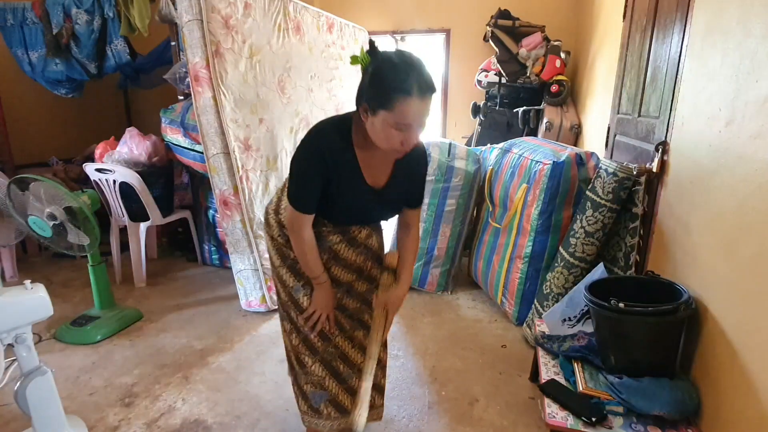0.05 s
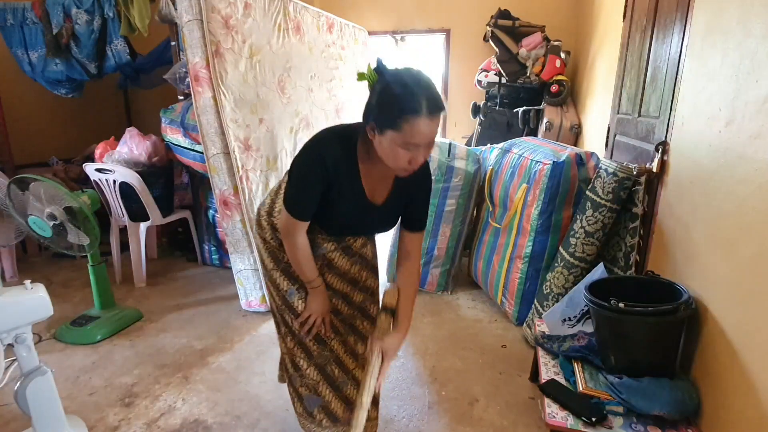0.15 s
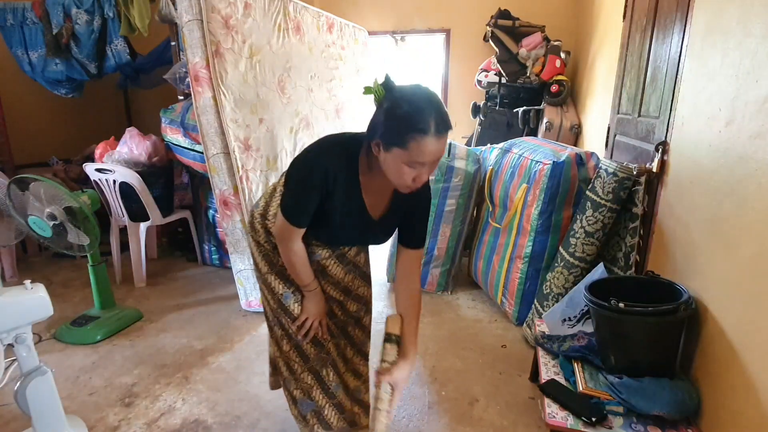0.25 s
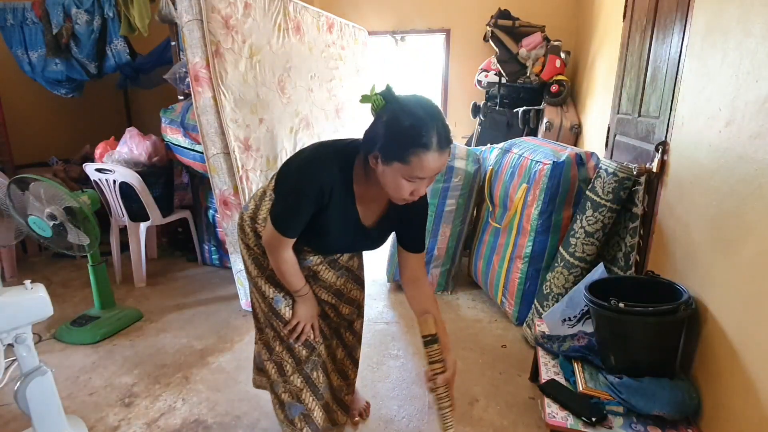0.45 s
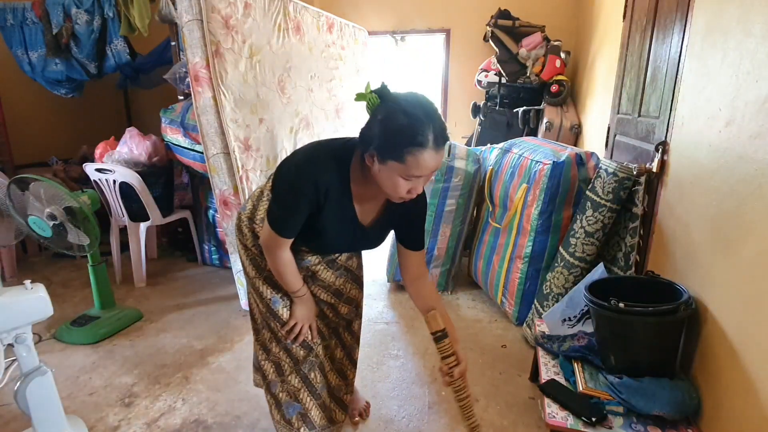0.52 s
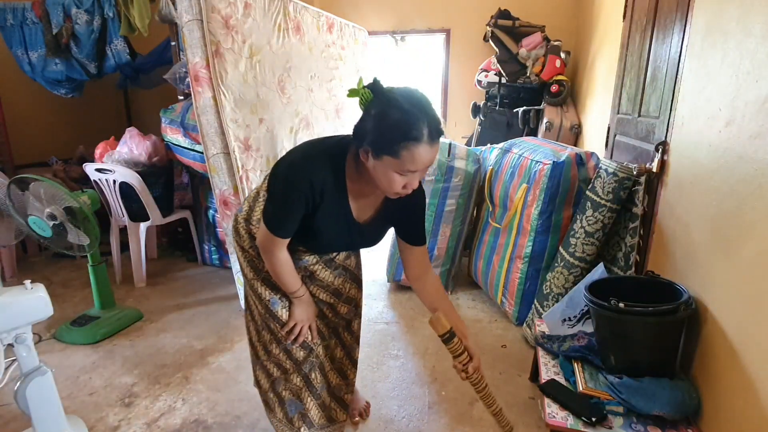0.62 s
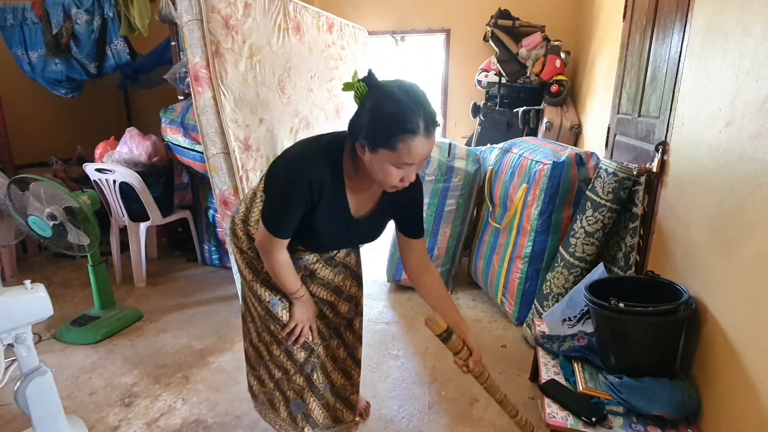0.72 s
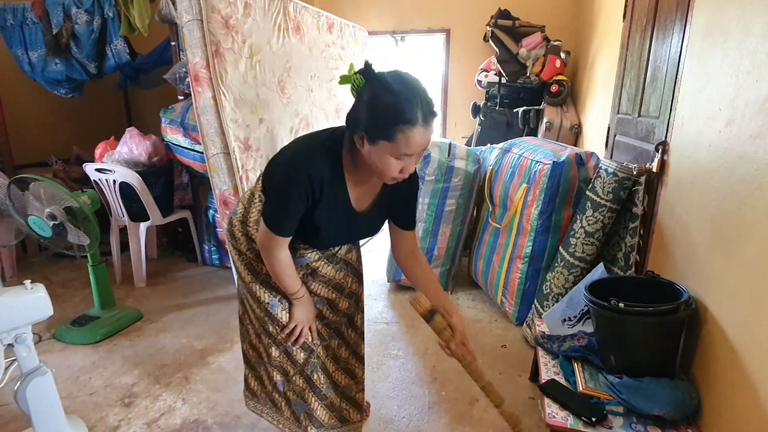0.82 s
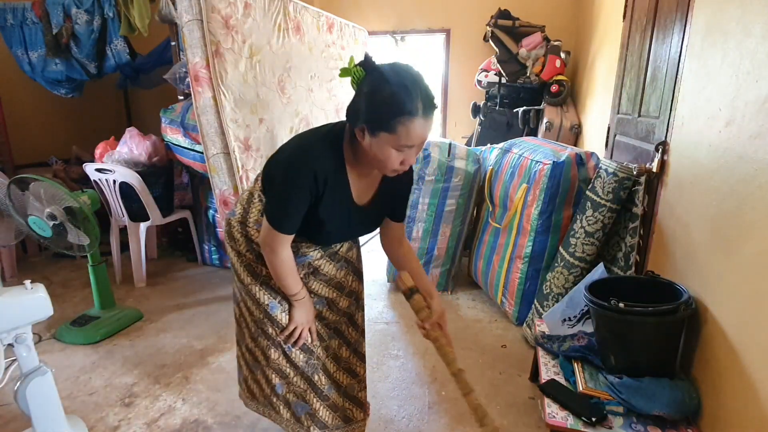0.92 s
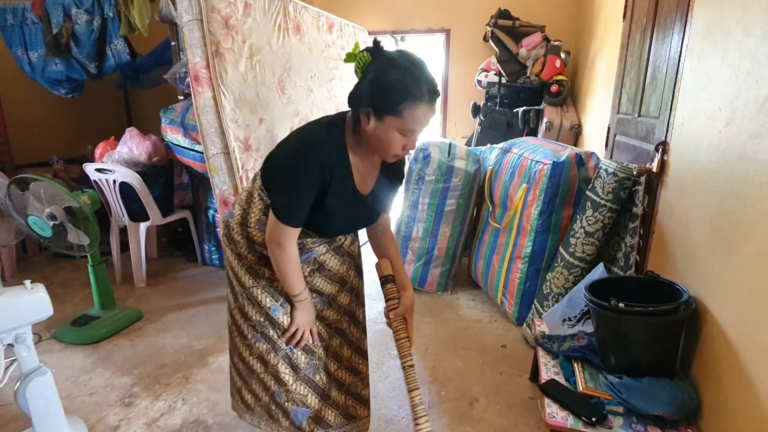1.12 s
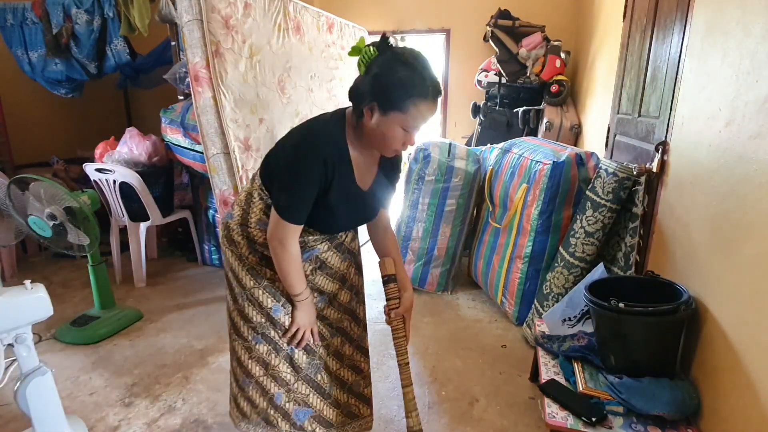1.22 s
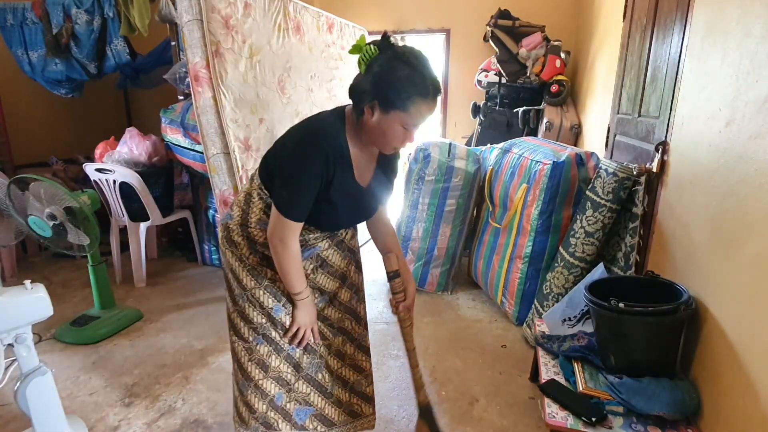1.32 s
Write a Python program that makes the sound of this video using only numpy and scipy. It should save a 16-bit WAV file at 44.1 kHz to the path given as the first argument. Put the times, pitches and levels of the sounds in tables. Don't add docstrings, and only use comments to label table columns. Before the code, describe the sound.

Broom sweeping on concrete indoors: one loud scratchy swish with clacks, then faint brushing and taps

```python
import sys
import numpy as np
from scipy import signal
from scipy.fft import rfft, irfft
from scipy.io import wavfile

SR = 44100
rng = np.random.default_rng(int(sys.argv[2]) if len(sys.argv) > 2 else 0)


def level_to_linear(level):
    exponent = np.asarray(level, float) / 20
    return 10 ** exponent


def store_wav(level_fs):
    pcm = np.round(np.clip(np.atleast_2d(level_fs), -1, 1) * 32767)
    wavfile.write(sys.argv[1], SR, pcm.T.astype(np.int16))


N = 59535


def read(points, hz):
    f, value = np.transpose(points)
    return np.interp(np.log(hz + 1), np.log(f + 1), value)


def evened(x):
    return x / np.sqrt(np.mean(x ** 2) + 1e-20)


def coloured(x, gain_db):
    both_sides_db = np.concatenate([gain_db, gain_db[-2:0:-1]])
    log_gain = np.log(level_to_linear(both_sides_db))
    phase = -signal.hilbert(log_gain).imag
    taps = np.fft.ifft(np.exp(log_gain + 1j * phase)).real[:4096]
    return signal.oaconvolve(x, taps)[:len(x)]


# [t/s, pressure level/dB, speed brightening/dB]
STROKE = [(0, -36, -1), (.07, -39.5, -6), (.14, -39, 2), (.2, -34, 3), (.245, -36.5, 6.5),
          (0.309, -39, 7.5), (.33, -22, -2), (0.366, -19.5, 3), (0.432, -24.5, 5), (0.511, -27, -2),
          (.62, -41, 6.5), (.672, -34.5, 3), (.75, -47, 5), (.88, -38.5, 0.5), (.97, -49.5, 9),
          (1.01, -42.5, 10), (1.1, -42, -30), (1.2, -67, -13)]
# [f/Hz, density/dB per Hz]
BRISTLE = [(60, -2.5), (160, -1.5), (250, -4), (400, -0.5), (750, -3.5), (2200, -8.5), (3400, -14.5),
           (7500, -20.5)]
# [f/Hz, level/dB]
TIPS = [(7600, -0.1), (8700, -5.5), (9600, -5), (11500, -1.5), (15500, -8.5)]
BRIGHT_FROM_HZ, BRIGHT_FULL_HZ = 600, 2000
SLIPS_PER_S, SLIP_SPREAD_DB = 3500, 2.5
CLUMP_DB, CLUMP_S = 2.5, .015


def bristles():
    t_s, pressure_db, bright_db = np.transpose(STROKE)
    t = np.arange(N) / SR
    slipping = rng.random(N) < SLIPS_PER_S / SR
    force = np.minimum(rng.exponential(1, N), 3.5)
    sign = rng.choice([-1., 1.], N)
    window = np.hanning(round(CLUMP_S * SR))
    clump = evened(signal.oaconvolve(rng.standard_normal(N), window, "same"))
    slips = sign * slipping * level_to_linear(SLIP_SPREAD_DB * force + CLUMP_DB * clump)

    filter_hz = np.fft.rfftfreq(8192, 1 / SR)
    scratch = evened(coloured(slips, read(BRISTLE, filter_hz) + read(TIPS, filter_hz)))

    high_share = read([(BRIGHT_FROM_HZ, 0), (BRIGHT_FULL_HZ, 1)], np.fft.rfftfreq(N, 1 / SR))
    high = irfft(rfft(scratch) * high_share, N)
    low = scratch - high
    pressure = level_to_linear(np.interp(t, t_s, pressure_db))
    return pressure * (low + high * level_to_linear(np.interp(t, t_s, bright_db)))


def rings(events, shape):
    length = 2000
    t = np.arange(length) / SR
    out = np.zeros(N + length)
    for t_s, level_db, *settings in events:
        at = round(t_s * SR)
        out[at:at + length] += level_to_linear(level_db) * shape(t, *settings)
    return out[:N]


# [t/s, peak level/dB, ring f/Hz]
SNAPS = [(.1486, -37, 2100), (.2024, -29, 1800), (.215, -25.5, 306), (.254, -14, 1800),
         (.2862, -16.5, 1920), (.3032, -10, 2100), (.331, -22.5, 2300), (.342, -18.5, 383),
         (.352, -11, 603), (.3692, -1.5, 1730), (.376, -8, 385), (.395, -21, 109), (.669, -15.5, 1330),
         (.676, -21.5, 514), (.915, -32.5, 495), (.991, -38, 1910), (1.0145, -20, 1470), (1.033, -29, 1550),
         (1.036, -27, 435), (1.3094, -33, 1700),
         (.6688, -17, 2100),
    (.724, -25, 2000),
    (.8858, -21, 2100),
    (.8858, -26, 4200),
    (.915, -30, 4200),
    (1.0052, -16, 1950),
    (1.0115, -22, 1800),
]
SNAP_CYCLES, SNAP_DB = 8.86, 2
SNAP_THUD, SNAP_THUD_DB = 0.44, -6


def snaps():
    def one(t, hz):
        decay = level_to_linear(-60 * t * hz / SNAP_CYCLES)
        rise = np.minimum(2 * t * hz, 1)
        end_fade = np.minimum(4 * (1 - t / t[-1]), 1)
        ring = np.sin(2 * np.pi * hz * t)
        thud = level_to_linear(SNAP_THUD_DB) * np.sin(2 * np.pi * SNAP_THUD * hz * t)
        return decay * rise * end_fade * (ring + thud)
    return -level_to_linear(SNAP_DB) * rings(SNAPS, one)


# [t/s, peak level/dB, left minus right/dB]
TICKS = [
    (.3035, -28, -8),
    (.33, -30, -6),
    (.7605, -25.5, -16),
    (.8168, -28, -16),
    (.8285, -33, 12),
]
# [f/Hz, t60/s, level/dB]
GRIT = [
    (4560, 0.0013, 20),
    (12000, 0.0028, 2),
    (6840, 0.0038, 2),
]
TICK_DB, TICK_RISE_S = 1.5, .0004


def ticks():
    def one(t):
        rise = np.minimum(t / TICK_RISE_S, 1)
        return rise * sum(level_to_linear(db - 60 * t / t60_s) * np.sin(2 * np.pi * hz * t)
                          for hz, t60_s, db in GRIT)

    def side(way):
        events = [(t_s, db + min(way * pan_db, 0)) for t_s, db, pan_db in TICKS]
        return level_to_linear(TICK_DB) * rings(events, one)
    return side(1), side(-1)


# [f/Hz, left minus right/dB]
LEFT = [(60, -4.5), (180, -1.5), (550, -0.5), (1650, 0.5), (4970, 0.0), (15000, -7.5)]
# [f/Hz, share/1]
STRAY = [(1200, 0.18), (3000, 0.86), (8000, 0.91)]
LEFT_LAG_S = 19.5 / SR


def direct(x, extra_lag_s, other, own_left=0):
    hz = np.fft.rfftfreq(2 * N, 1 / SR)
    side = level_to_linear(read(LEFT, hz) / 2)
    stray = np.maximum(np.clip(read(STRAY, hz), 0, 1), own_left)
    right = rfft(x, 2 * N)
    left = np.sqrt(1 - stray ** 2) * right + stray * rfft(other, 2 * N)
    delay = np.exp(-2j * np.pi * hz * (LEFT_LAG_S + extra_lag_s))
    return irfft(np.array([left * side * delay, right / side]))[:, :N]


# [f/Hz, likeness/1]
ALIKE = [(100, 0.97), (300, .85), (550, 0.28), (800, -0.18), (1100, -0.6), (1500, -0.28), (2300, 0.066),
         (4000, 0.16)]


def diffuse(pair):
    n = pair.shape[1]
    z = rfft(pair)
    same = np.clip(read(ALIKE, np.fft.rfftfreq(n, 1 / SR)), -1, 1)
    return irfft(np.array([z[0], same * z[0] + np.sqrt(1 - same ** 2) * z[1]]), n)


# [f/Hz, t60/s]
ROOM = [(100, 0.18), (500, 0.78), (2000, 0.63), (8000, 0.59), (15000, 0.35)]
EARLY_S = 0.0025


def room(pair):
    spacing = 20
    slots = np.arange(0, SR - spacing, spacing)
    at = slots + rng.integers(0, spacing, (2, len(slots)))
    taps = np.zeros((2, SR))
    np.put_along_axis(taps, at, rng.choice([-1., 1.], at.shape), 1)
    taps *= np.minimum(np.arange(SR) / SR / EARLY_S, 1) ** 2
    hz, t, z = signal.stft(taps, SR, nperseg=256)
    decay = level_to_linear(-60 * t / read(ROOM, hz)[:, None])
    tail = diffuse(signal.istft(z * decay, SR, nperseg=256)[1])
    return signal.fftconvolve(pair, tail / np.linalg.norm(tail[0]), axes=1)[:, :N]


ROOM_DB, DRY_DB = -2.5, -2.5


def heard(*source):
    pair = direct(*source)
    unlagged = np.array([np.roll(pair[0], -round(LEFT_LAG_S * SR)), pair[1]])
    return level_to_linear(DRY_DB) * pair + level_to_linear(ROOM_DB) * room(unlagged)


# [f/Hz, density/dB per Hz]
AIR = [(30, 3), (130, -1.7), (250, -4), (1000, -6), (2300, -11), (5000, -23), (8900, -27.5), (12000, -27.5)]
AIR_DB = -47


def air():
    hz = np.fft.rfftfreq(N, 1 / SR)
    noise = diffuse(rng.standard_normal((2, N)))
    gain_db = read(AIR, hz) + np.outer([.5, -.5], read(LEFT, hz))
    return level_to_linear(AIR_DB) * evened(irfft(rfft(noise) * level_to_linear(gain_db), N))


TUFT_LAGS_S = [-.00004, -.00001, .00001, .00003]


def scene():
    tufts = [bristles() / 2 for _ in TUFT_LAGS_S]
    neighbours = tufts[1:] + tufts[:1]
    broom = sum(heard(x, lag_s, other) for x, lag_s, other in zip(tufts, TUFT_LAGS_S, neighbours))
    left_grit, right_grit = ticks()
    stalks = snaps()
    impacts = heard(stalks + right_grit, 0, stalks + left_grit, 1)
    return broom + impacts + air()


def top_cut(x):
    return signal.sosfilt(signal.butter(12, 15720, fs=SR, output="sos"), x)


EDGE_HZ, MIC_LOW_HZ = 15600, 55


def record(dry):
    bass_cut = signal.butter(2, MIC_LOW_HZ, "high", fs=SR, output="sos")
    thin = signal.sosfilt(bass_cut, dry)
    band_limit = signal.firwin(511, EDGE_HZ, window=("kaiser", 9), fs=SR)
    mix = signal.oaconvolve(thin, band_limit[None], "same")
    return top_cut(mix)


dry = scene()
out = record(dry)
store_wav(out)
```